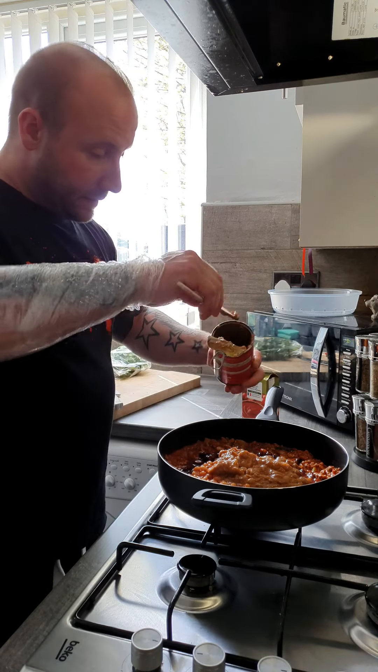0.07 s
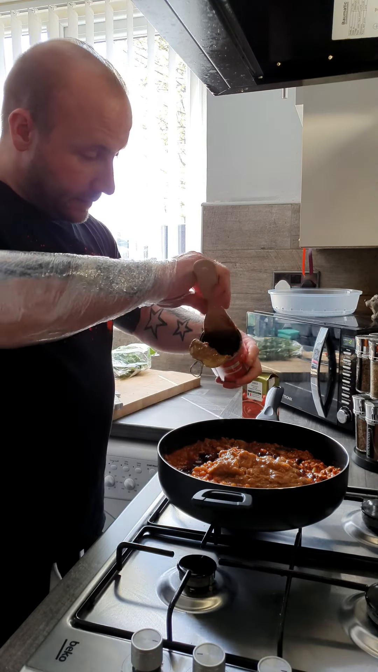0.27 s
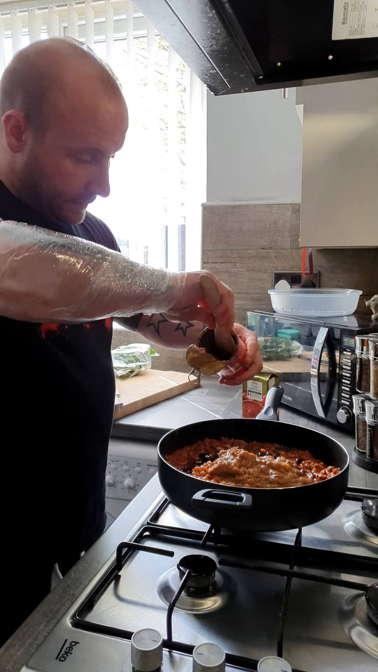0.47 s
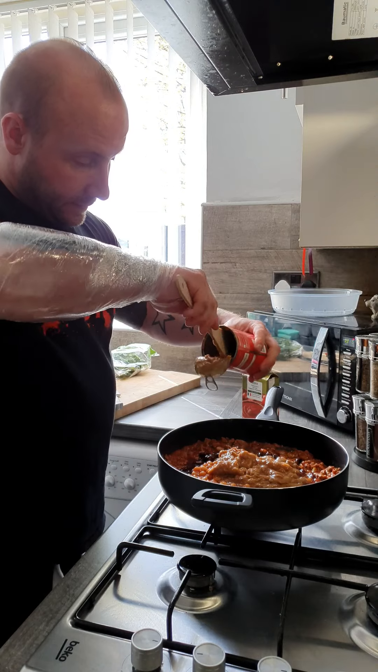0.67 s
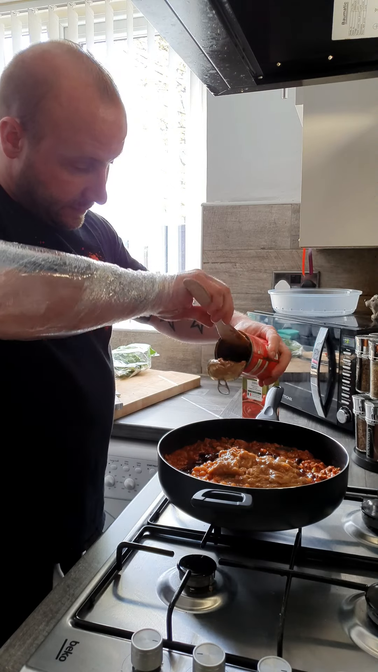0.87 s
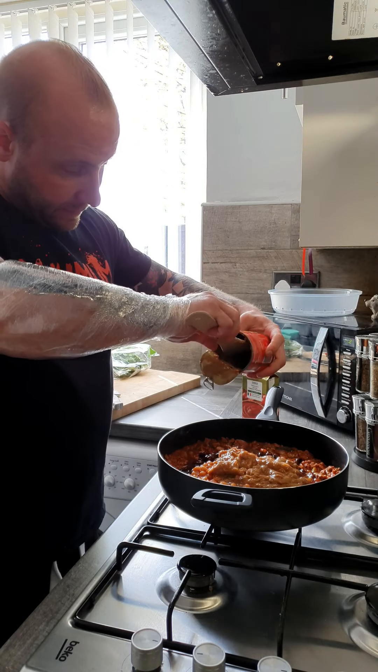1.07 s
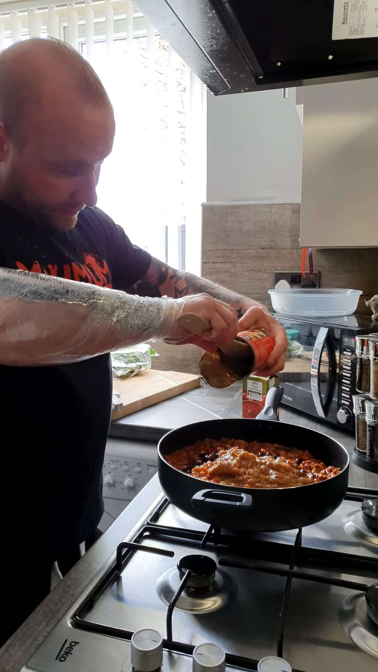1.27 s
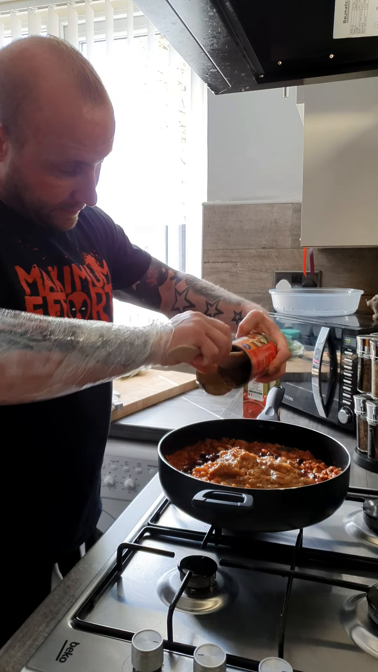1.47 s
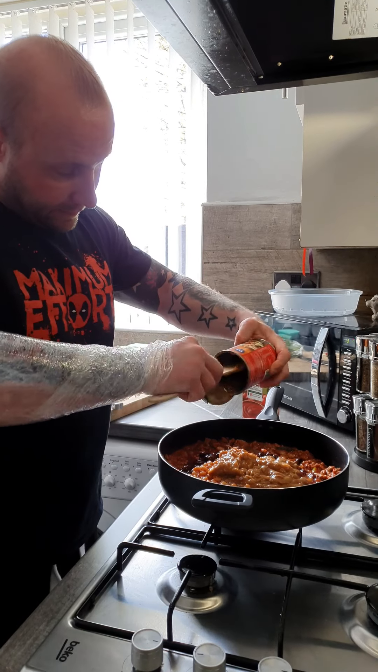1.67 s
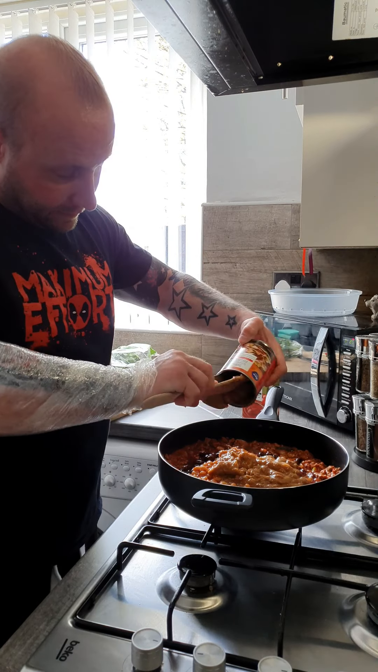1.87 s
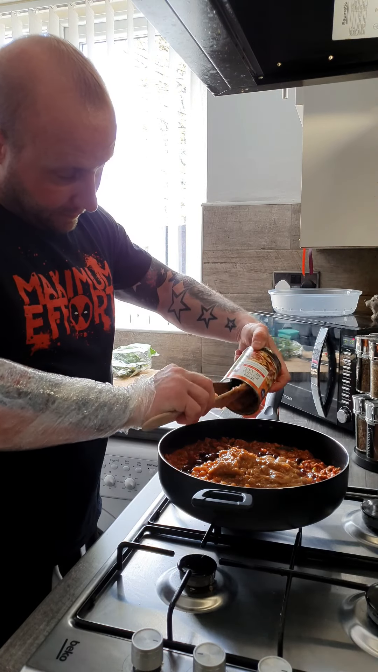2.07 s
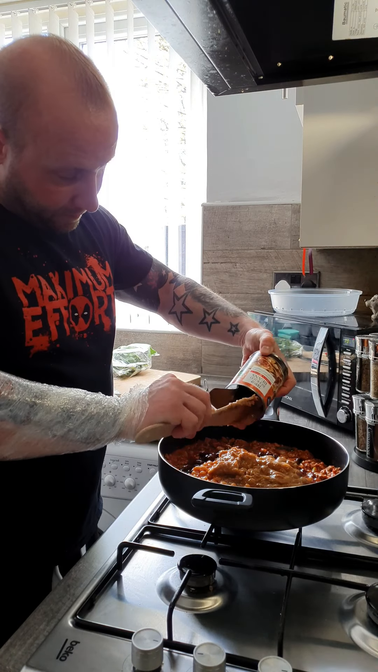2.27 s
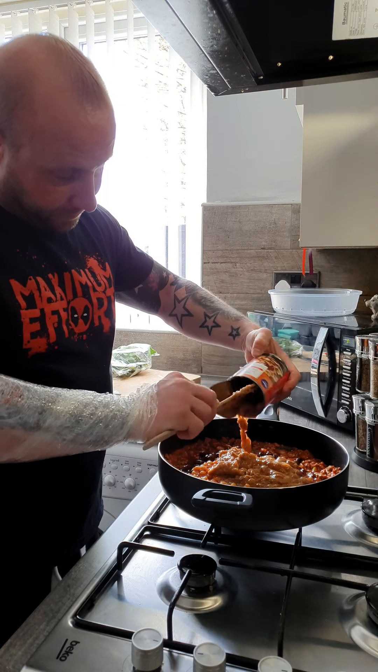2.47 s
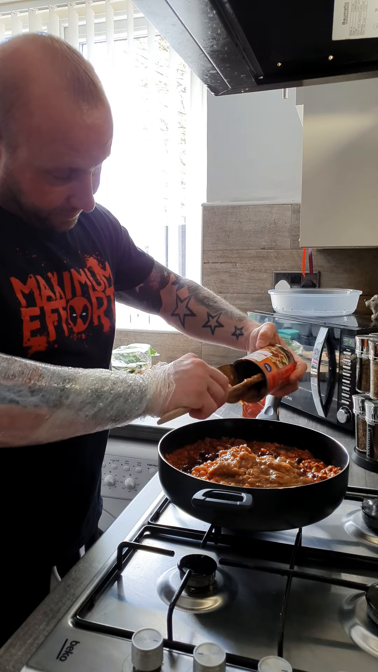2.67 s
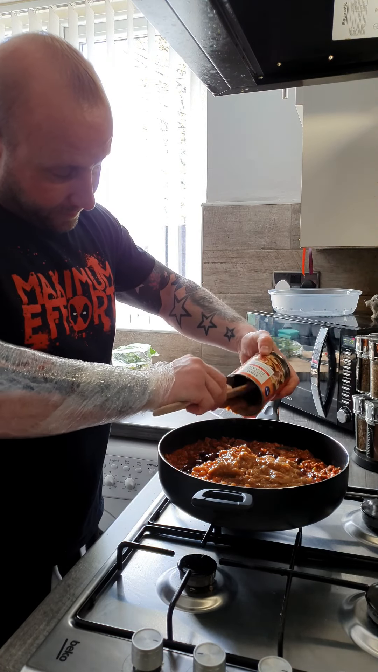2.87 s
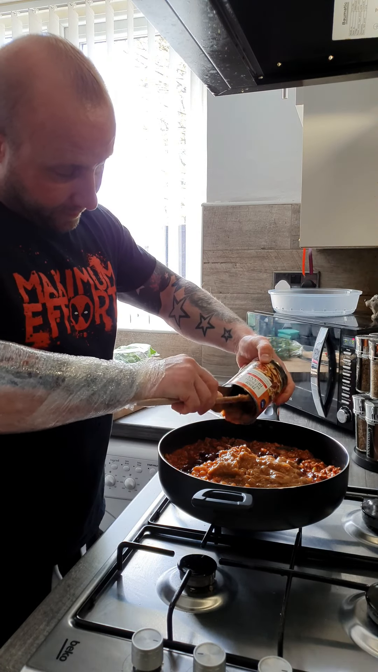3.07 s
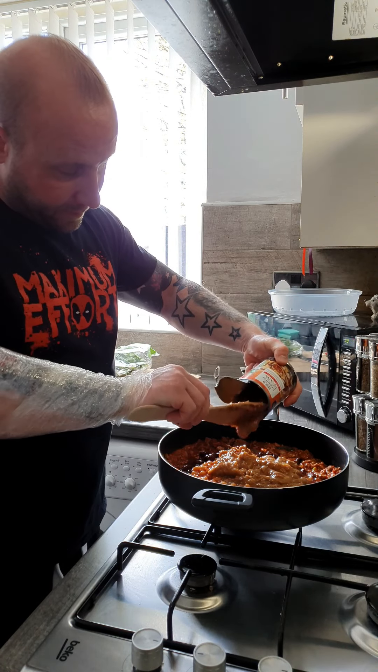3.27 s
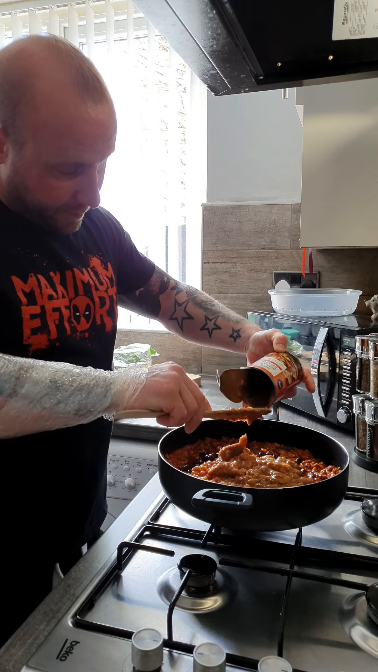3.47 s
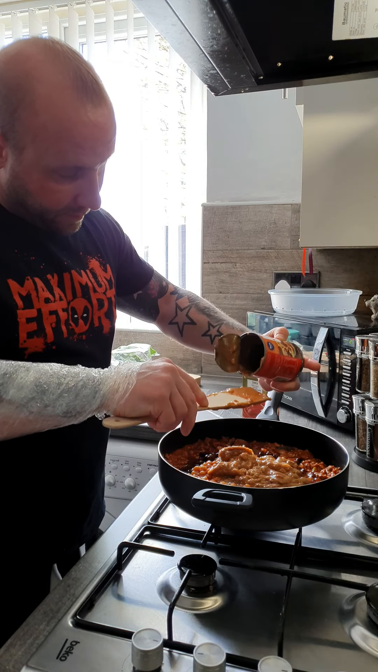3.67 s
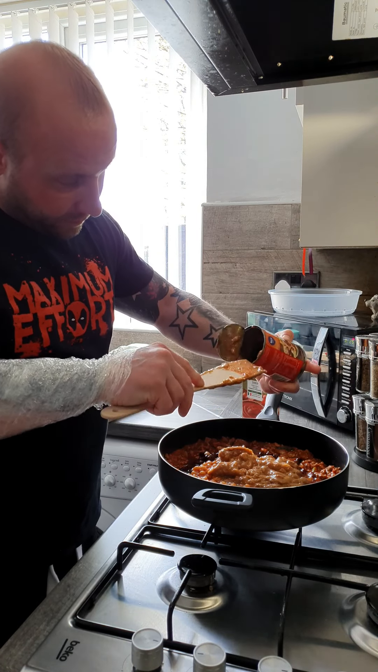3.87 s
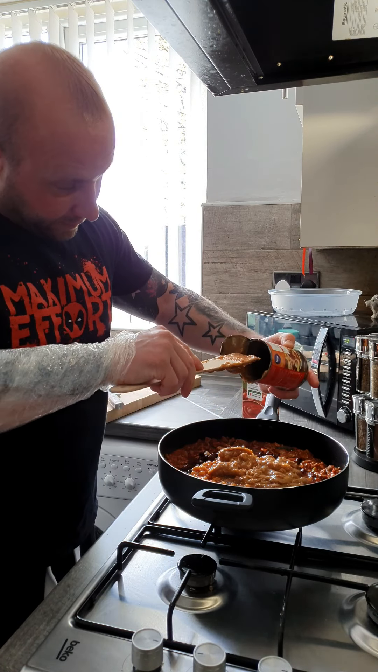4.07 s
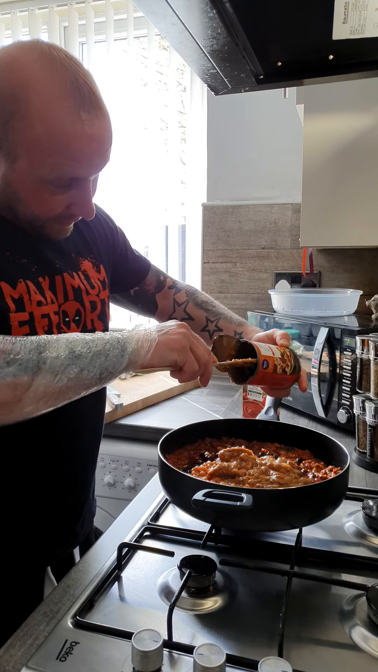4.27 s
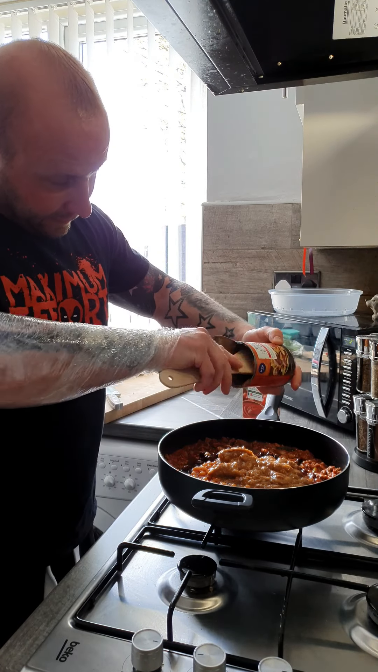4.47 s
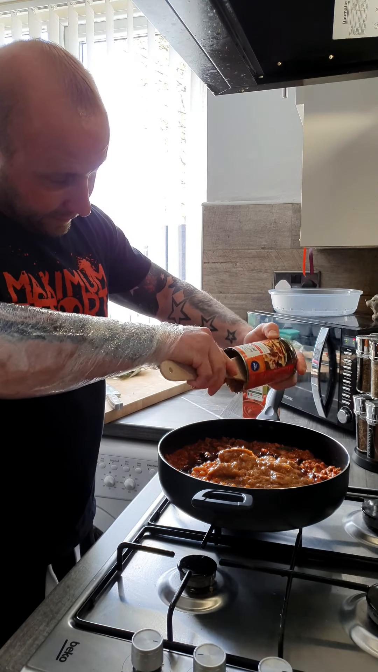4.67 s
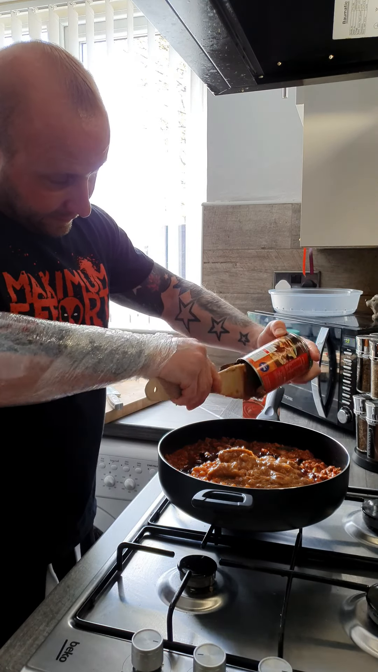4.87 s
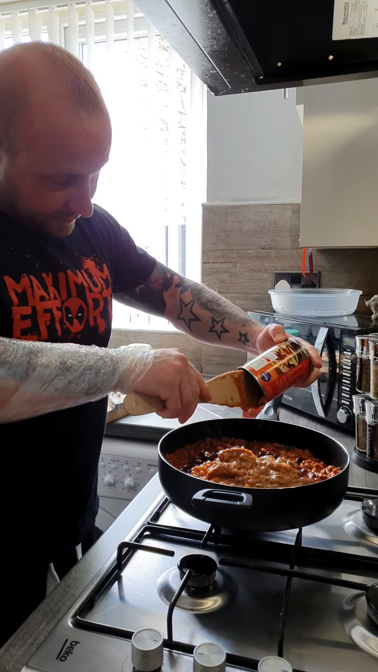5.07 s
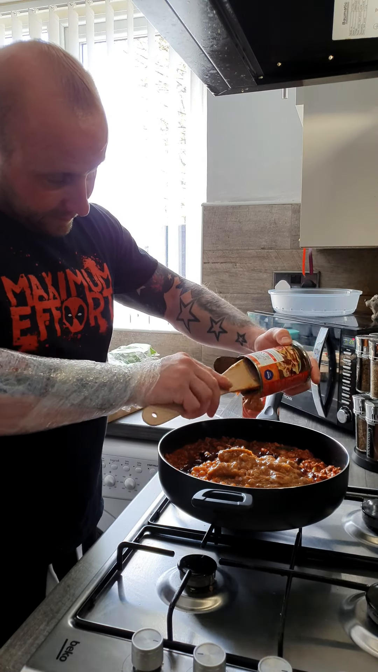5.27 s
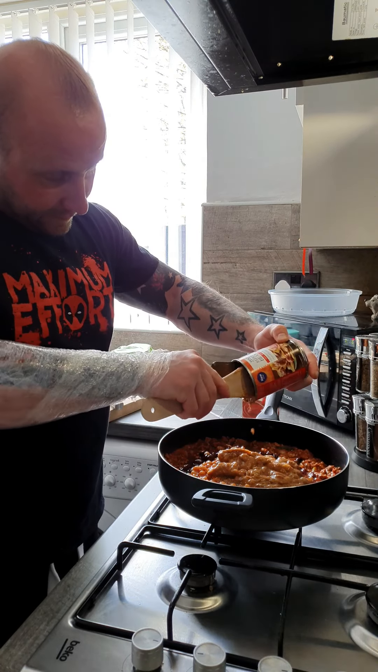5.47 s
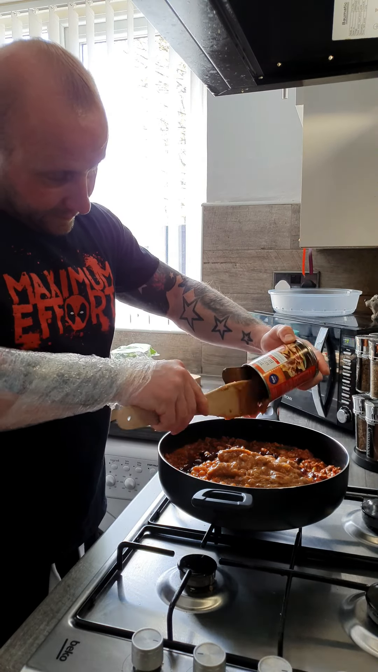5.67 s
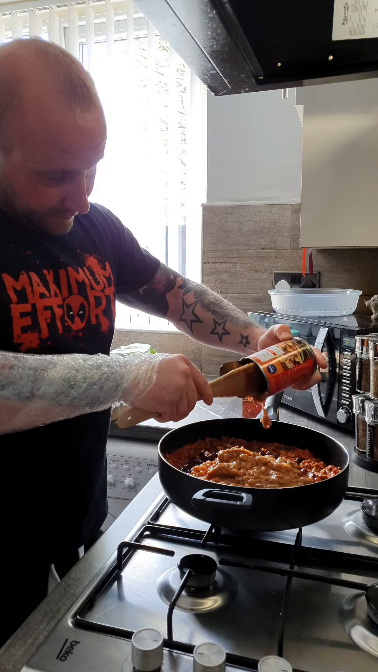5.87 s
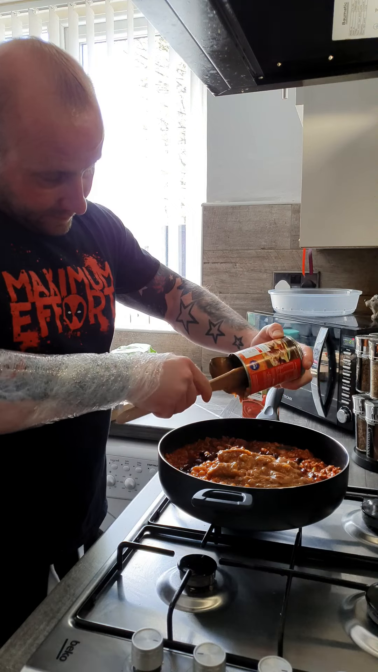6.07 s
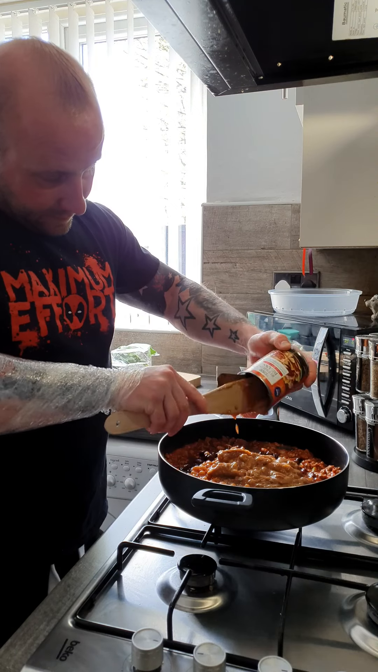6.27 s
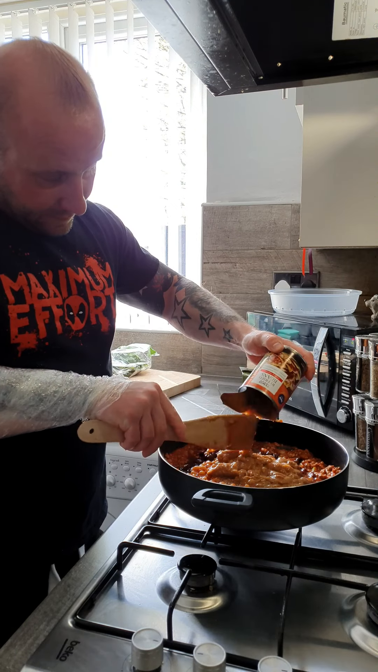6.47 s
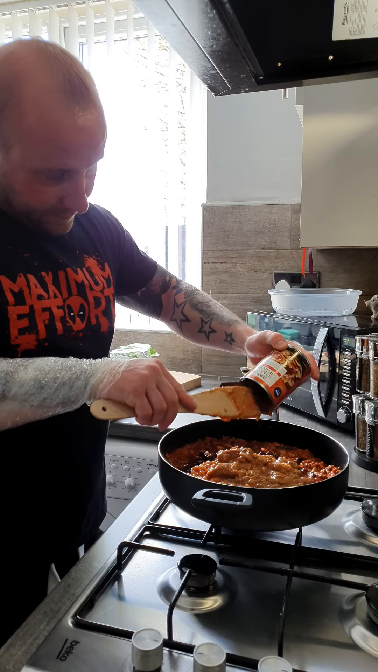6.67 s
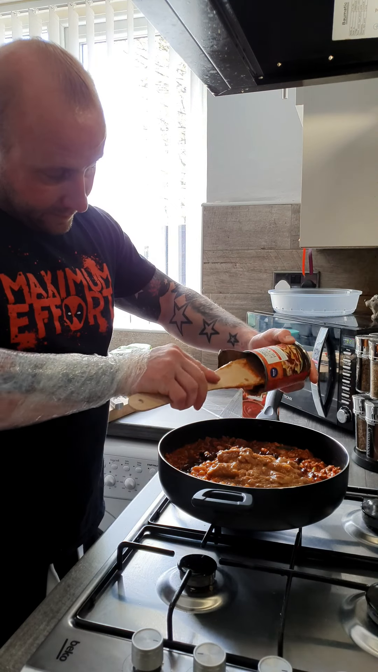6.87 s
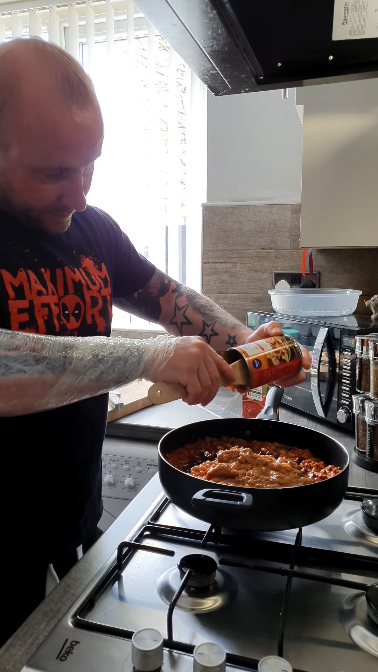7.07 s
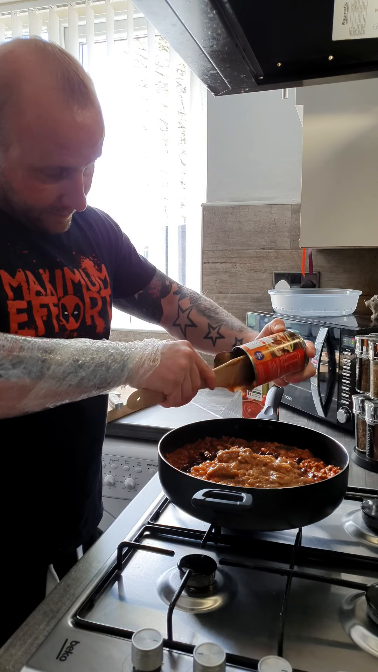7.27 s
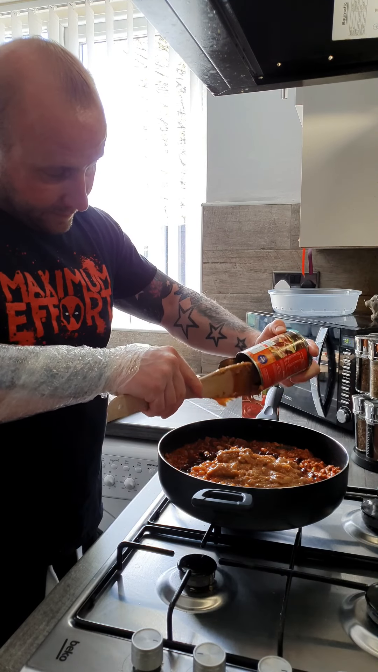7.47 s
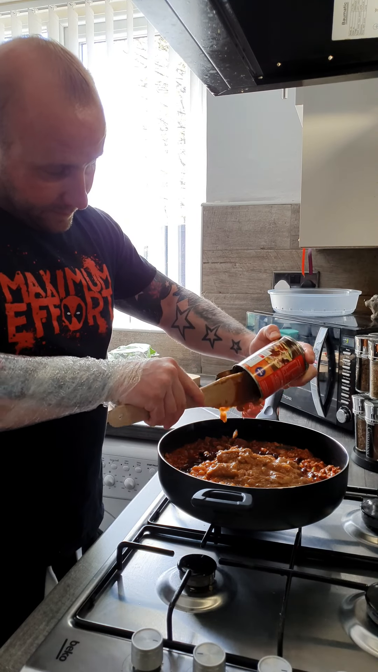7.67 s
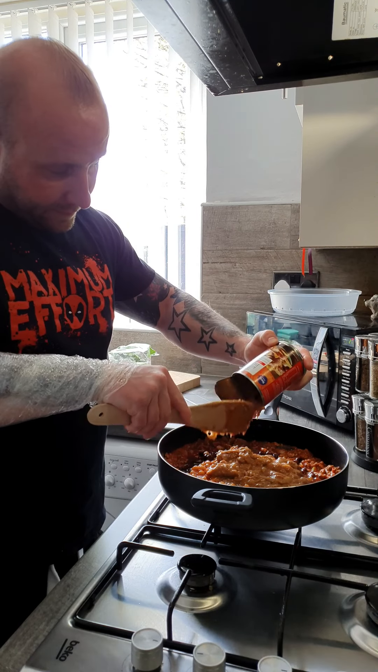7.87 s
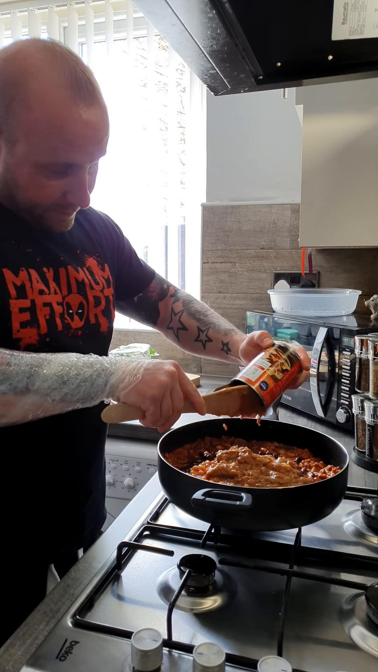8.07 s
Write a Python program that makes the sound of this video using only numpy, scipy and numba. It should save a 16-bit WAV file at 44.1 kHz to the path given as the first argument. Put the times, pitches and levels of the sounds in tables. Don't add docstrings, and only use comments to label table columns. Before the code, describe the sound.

A wooden spoon scrapes sauce from a hand-held tin about a metre from a phone in a small tiled kitchen. Short wet rasps alternate with crisp taps and dull knocks, each ringing the hollow can at a wavering mid-low pitch. A heavy low bump comes early, the loudest clatter just before five seconds, then sparser strokes over quiet room tone.

```python
import sys
import numpy as np
from scipy import signal
from scipy.fft import rfft, irfft, next_fast_len
from scipy.io import wavfile
from numba import njit

SR = 44100
rng = np.random.default_rng(int(sys.argv[2]) if len(sys.argv) > 2 else 0)


def log_audio(samples):
    frames = np.atleast_2d(samples).T
    limited = np.clip(frames, -1, 1)
    pcm = np.round(limited * 32767).astype(np.int16)
    wavfile.write(sys.argv[1], SR, pcm)


def volts_from_decibels(level):
    exponent = np.asarray(level, float) / 20
    return 10 ** exponent


N = 358076
TIME = np.arange(N) / SR

# frequency in Hz, level in dB per Hz.
ROOM_TONE = [(18, -31), (30, -1), (66, 2), (423, -22.5), (643, -19), (977, -26), (5230, -36), (5650, -27),
             (6440, -40), (15700, -39.5)]
# frequency in Hz, left minus right in dB.
LEFT_LEAD = [(150, 1), (380, 2), (700, 3.5), (1500, 5), (2400, 5.5), (4400, 13.5), (8000, 11.5), (12000, 4)]
# time in seconds, peak in dB, pitch in Hz, T60 in seconds.
BUMPS = [
    (1.414, -12, 59, 0.15),
    (3.817, -58, 117.7, 0.25),
    (4.133, -56.5, 74.2, 0.092),
    (7.018, -35, 78.6, 0.19),
    (7.454, -35, 87, 0.15),
    (7.509, -40, 109, 0.15),
]
# landing and lifting in seconds, pressure in dB,
# wet slide in dB above pressure, air in the tin in dB above pressure.
SCRAPES = [(0.0, 0.2, -61.5, -10.5, -10), (0.225, 0.45, -43.5, -8, -6.5), (0.81, 0.96, -43.5, -10.5, -6.5),
           (1.17, 1.27, -44, -17, -5.5), (1.48, 1.58, -51, -6.5, -10), (2.36, 2.52, -48.5, -8.5, 2),
           (2.87, 2.97, -47.5, -20.5, -5), (3.1, 3.22, -44, -8.5, 5.5), (4.2, 4.42, -46.5, -11, 4),
           (4.45, 4.57, -47, -7.5, 5.5), (4.725, 4.85, -37, -17.5, 4.5), (5.1, 5.26, -50, -10, 6),
           (5.48, 5.62, -57.5, -9, 3.5), (5.82, 5.95, -50, -8, -0.5), (6.03, 6.245, -65.5, -5, 5.5),
           (6.8, 7.03, -45, -10, 2.5), (7.2, 7.33, -70.5, -3, 10), (7.505, 7.63, -47.5, -15, 7),
           (7.962, 8.07, -46, -10, -0.5)]
# landing and lifting in seconds, pressure in dB,
# wet slide in dB above pressure, air in the tin in dB above pressure.
SKIDS = [(0.52, 0.63, -65.5, -13.5, -12.5), (6.745, 6.8, -72, -9, 22.5), (0.69, 0.74, -48, -21, -27),
         (1.0, 1.08, -56.5, -6, -8), (1.375, 1.42, -46, -12.5, 0.5), (1.63, 1.7, -64.5, -2, -11),
         (1.845, 1.88, -46.5, -14, 3), (1.96, 2.02, -62, -6, 2), (2.063, 2.13, -44, -13.5, 13.5),
         (2.17, 2.21, -53, -12, 5.5), (2.685, 2.71, -52.5, -13.5, -20), (2.772, 2.8, -42.5, -29, -13),
         (3.815, 3.89, -78.5, -28, -2), (4.1, 4.13, -81.5, 7, 5), (5.33, 5.39, -57, -6.5, -0.5),
         (5.757, 5.79, -41.5, -19.5, -4), (6.25, 6.29, -45.5, -8.5, -2), (6.35, 6.39, -50, -7, -1.5),
         (7.345, 7.38, -53.5, -15, -5.5), (7.42, 7.49, -70, -17.5, 7.5), (7.68, 7.76, -57.5, -10.5, 6)]
# start and end in seconds, first and last rate in Hz, level in dB.
RIBS = [
    (4.755, 4.85, 115, 180, -33.5),
    (4.85, 4.885, 200, 202, -36.5),
    (2.93, 2.98, 71, 100, -32.5),
    (5.5, 5.65, 140, 152, -49),
    (7.29, 7.37, 165, 190, -58.5),
]
# time in seconds, air peak in dB, wall and thud in dB above air.
TAPS = [(0.995, -28, -18, -2.5), (1.145, -31, -4, -11.5), (1.545, -35.5, -6.5, -35),
        (1.621, -35.5, -34, -15), (1.855, -20.5, -27, -18), (1.976, -34, -20, -29),
        (2.187, -17, -15.5, -37), (2.368, -27, -24, -45), (2.781, -24.5, -12, -8.5),
        (2.843, -29.5, -21, -23), (3.015, -31, -36, -26.5), (4.342, -30, -12.5, -32),
        (4.463, -17, -14.5, -11.5), (4.573, -17.5, -25, -36), (4.58, -16, -25.5, -19),
        (4.736, -32.5, -15, -23), (4.805, -9.5, -18, -28), (5.104, -36.5, -16, -12), (5.574, -28, -35, -22),
        (5.768, -20, -11, -20), (5.978, -21.5, -13.5, -15), (6.263, -24, -12, -20), (6.298, -26, -36, -19),
        (6.394, -36, -14, -30), (6.752, -33.5, -38, -22), (7.515, -32, -8, -4.5), (7.574, -29, -6.5, -9),
        (7.633, -19, -15, -12.5), (7.973, -33, -7.5, -14), (8.058, -18.5, -14.5, -15)]
# time in seconds, air peak in dB, wall and thud in dB above air.
KNOCKS = [(0.695, -42, -8, -6), (0.723, -27, -8, -7), (0.822, -32.5, -8, -8), (0.857, -32, -3.5, 0.5),
          (1.756, -45, -11, -11), (1.824, -36.5, -16.5, -15), (1.883, -26.5, -30.5, -4),
          (2.075, -19.5, -33.5, -25), (2.451, -41, -11.5, -25), (2.701, -34.5, -17.5, -11),
          (2.708, -33.5, -12.5, -9), (2.915, -20.5, -26, -23), (2.95, -14.5, -16, -13),
          (3.141, -23, -37, -20), (3.203, -30, -21, -25), (3.239, -25, -17, -20), (4.76, -17, -17.5, -17),
          (4.841, -12.5, -21, -16.5), (5.229, -30.5, -16.5, -10.5), (5.511, -32, -32, -26),
          (5.608, -28, -14, -13.5), (5.915, -27.5, -4, -28), (6.385, -42.5, -5.5, -19),
          (6.818, -30.5, -12.5, -14.5), (0.28, -37.5, -23, -25), (1.49, -36.5, -25, -25),
          (6.912, -33.5, -25, -34), (6.946, -28.5, -39, -32), (7.026, -28.5, -28, -4.5)]
# time in seconds, pitch in Hz.
MOUTH_PITCH = [(0.0, 588), (0.54, 697), (0.68, 587), (1.06, 699), (1.31, 616), (1.7, 682), (1.92, 562.4),
               (2.83, 618), (3.1, 563), (3.84, 645), (4.02, 560), (4.34, 635), (4.7, 601.2), (6.17, 640.6),
               (6.22, 600.6), (7.1, 640), (7.35, 597), (8.12, 623)]
# time in seconds, frequency in Hz.
RASP_PITCH = [(0.0, 1900), (0.42, 1520), (0.68, 1550), (0.95, 1930), (1.2, 1500), (1.6, 1760), (2.15, 1900),
              (2.5, 2300), (2.8, 2050), (2.97, 1480), (3.2, 2100), (4.45, 1440), (4.78, 1600), (4.86, 2300),
              (5.9, 2280), (6.8, 2250), (7.02, 1780), (7.36, 1330)]
# frequency in Hz, width in Hz, level in dB.
SPOON_MODES = [(211, 53, -7), (318, 54.7, 1.5), (374, 70, -1.5)]
# frequency in Hz, width in Hz, level in dB.
WALL_MODES = [(924.6, 210, 7), (1075.5, 32, -10.5), (1363, 74, 4.5), (1388, 130, -0.5), (1520, 48, -4),
              (1616, 62, -5.5), (1738, 99, -1), (1845, 43, -13.5), (1930, 87, -13.5), (2052, 34, -4),
              (2250, 61, -7), (2260, 15, -9.5), (2470, 34, -10.5), (2580, 72, -4), (3066, 136, 2),
              (3353, 27, -14), (3820, 63, -11), (3980, 57, -14.5)]
# frequency in Hz, level in dB per Hz.
FRICTION = [(470, -38), (800, -4.5), (1590, -4.5), (1870, -3), (2450, -3.5), (3480, 2), (4410, -9),
            (7820, -20), (11600, -21), (15700, -24.5)]

ROOM_DB, WHINE_HZ, WHINE_DB = -77.5, 5520, -90
KITCHEN_T60_S, KITCHEN_DB = 0.32, -8
RUMBLE_FLOOR_DB = -70.5
RUMBLE_DB, RUMBLE_SHARE, BUMP_RUMBLE_DB = -44, 0.48, -10.5
SCRAPE_BUILD_DB, SKID_BUILD_DB = 11, 6.5
LAND_S, LIFT_DB_PER_S = 0.018, 238
SWELL_S = 0.00348
TAP_SHUDDER_S, KNOCK_SHUDDER_S = 0.012, 0.023
DENT_SHARE, DENT_S = 0.12, 0.018
SPOON_DB = -5.5


def unit(x):
    return x / np.sqrt(np.mean(x ** 2))


def on_log(table, hz):
    f, v = np.transpose(table)
    return np.interp(np.log(hz + 1), np.log(f), v)


def colour(x, gain):
    size = next_fast_len(N)
    hz = np.arange(size // 2 + 1) * SR / size
    return irfft(rfft(x, size) * gain(hz), size)[..., :N]


@njit
def moving_band(x, hz, width):
    y, band, low = np.empty(len(x)), 0., 0.
    for i in range(len(x)):
        g, k = np.tan(np.pi * hz[i] / SR), width / hz[i]
        v = (band + g * (x[i] - low)) / (1 + g * (g + k))
        band, low, y[i] = 2 * v - band, low + 2 * g * v, k * v
    return y


def ring(x, hz, width):
    r, turn = np.exp(-np.pi * width / SR), 2 * np.pi * hz / SR
    return signal.lfilter([0, np.sin(turn)], [1, -2 * r * np.cos(turn), r * r], x + 1e-18)


def clicks(times, db):
    x = np.zeros(N)
    np.add.at(x, np.minimum((np.asarray(times) * SR).astype(int), N - 1), volts_from_decibels(db))
    return x


def fade(x, s):
    return signal.lfilter([1], [1, -np.exp(-1 / (s * SR))], x)


def sway(rate, db):
    knots = np.clip(rng.standard_normal(int(N / SR * 60)), -3, 1.3)
    return np.interp(TIME, np.arange(len(knots)) / rate, volts_from_decibels(db * knots))


def quiet():
    tone = colour(rng.standard_normal((2, N)), lambda f: volts_from_decibels(on_log(ROOM_TONE, f)) * (f > 120))
    whine = volts_from_decibels(WHINE_DB + 3.5) * sway(6, 1.5) * np.sin(2 * np.pi * WHINE_HZ * TIME)
    return volts_from_decibels(ROOM_DB + 3) * sway(7.9, 1.7) * unit(tone) + whine


def kitchen(x):
    t = np.arange(SR // 2) / SR
    tail = rng.standard_normal((2, len(t))) * volts_from_decibels(-60 * t / KITCHEN_T60_S) * (t > .008)
    tail /= np.sqrt(np.sum(tail ** 2, axis=1, keepdims=True))
    return volts_from_decibels(KITCHEN_DB) * signal.fftconvolve(x[None], tail, axes=1)[:, :N]


def ports(x):
    return colour(x, lambda f: volts_from_decibels(np.outer([.5, -.5], on_log(LEFT_LEAD, f))))


def bumps(pressure):
    thuds = sum(ring(clicks([s], db + 5.5), hz, 2.0 / t60) for s, db, hz, t60 in BUMPS)
    s, db = np.transpose(BUMPS)[:2]
    shake = fade(clicks(s, db + BUMP_RUMBLE_DB), 0.046) + volts_from_decibels(RUMBLE_FLOOR_DB)
    shake = shake + volts_from_decibels(RUMBLE_DB) * pressure ** RUMBLE_SHARE
    rumble = volts_from_decibels(-16) * shake * sway(16, 4.9) * ring(rng.standard_normal((2, N)), 73, 31)
    right = thuds + rumble[1]
    left = volts_from_decibels(-8.5) * rumble[0] - volts_from_decibels(-35.5) * right
    return colour(np.array([left, right]), lambda f: 1 / (1 + (38 / (f + 1)) ** 3) / (1 + (f / 150) ** 2))


def strokes():
    out = np.zeros((3, N))
    for rows, build_db in ((SCRAPES, SCRAPE_BUILD_DB), (SKIDS, SKID_BUILD_DB)):
        for t0, t1, db, slide_db, air_db in rows:
            i = slice(max(int(t0 * SR), 0), int((t1 + .5) * SR))
            t = TIME[i]
            build = -build_db * (t1 - t) / (t1 - t0)
            shape_db = np.minimum(build, -LIFT_DB_PER_S * (t - t1))
            level_db = db + np.array([[0], [slide_db], [air_db]])
            out[:, i] += volts_from_decibels(level_db + shape_db) * np.minimum((t - t0) / LAND_S, 1)
    return np.maximum(out, 1e-5)


def grains(rate, spread_db, alike):
    size = (rng.random(N) < rate / SR) * volts_from_decibels(spread_db * np.minimum(rng.exponential(size=N), 3.5))
    common, own = rng.standard_normal(N), rng.standard_normal((2, N))
    return unit(size * (np.sqrt(alike) * common + np.sqrt(1 - alike) * own))


def ribs():
    drive, uneven = np.zeros(N), volts_from_decibels(2.5 * rng.standard_normal(N))
    for t0, t1, hz0, hz1, db in RIBS:
        rate = np.interp(TIME, [t0, t1], [hz0, hz1]) * (TIME > t0) * (TIME < t1)
        drive += volts_from_decibels(db) * np.diff(np.floor(np.cumsum(rate / SR)), prepend=0)
    return drive * uneven


def shudder(at, db, length, hz):
    x, chance = np.zeros(N), rng.random((len(at), 2))
    for t0, level, s, (turn, off) in zip(at, volts_from_decibels(db), length, chance):
        i = np.arange(int(t0 * SR), min(int((t0 + s) * SR), N))
        t = TIME[i] - t0
        swell = np.abs(np.sin(np.pi * t / s))
        x[i] += level * swell * np.sin(2 * np.pi * (turn + hz[i[0]] * (1.1 + 0.023 * off) * t))
    return x


def crack(x, s):
    return rng.standard_normal((2, N)) * fade(x, s) / np.sqrt(s * SR / 2)


def body(modes, drive, patchy_db, spread):
    angle = np.pi / 4 + spread * rng.uniform(-0.97, 1, len(modes))
    aim = np.sqrt(2) * np.array([np.cos(angle), np.sin(angle)]).T[:, :, None]
    return sum(a * ring(volts_from_decibels(db) * sway(7, patchy_db) * drive, hz, w) for a, (hz, w, db) in zip(aim, modes))


def spoon(jolts, pressure, slips, rib):
    drive = volts_from_decibels(SPOON_DB - 26.5) * pressure * slips + jolts + volts_from_decibels(2.0) * rib
    bending = body(SPOON_MODES, drive, 3.6, 0.95)
    return colour(bending, lambda f: 1 / (1 + (130 / (f + 1)) ** 3) / (1 + (f / 520) ** 3))


def friction(pressure, slide, fine, clank, rasp_hz):
    rasp = volts_from_decibels(1.0) * pressure * fine + volts_from_decibels(19) * clank
    hiss = volts_from_decibels(21.5) * slide * sway(16, 1.8) * fine + volts_from_decibels(17) * clank
    rasp += volts_from_decibels(18) * np.array([moving_band(c + 1e-18, rasp_hz, 130.0) for c in rasp])
    patch_hz = np.clip(9800 * sway(9, 2.4), 5000, 15000)
    hiss += np.array([moving_band(c + 1e-18, patch_hz, 1500.0) for c in hiss])

    def shape(f):
        return volts_from_decibels(on_log(FRICTION, f))

    def edge(f):
        return 1 / (1 + (f / 4600) ** 8)

    return colour(rasp, lambda f: shape(f) * edge(f)) + colour(hiss, lambda f: shape(f) * (1 - edge(f)))


def air(x, hz):
    fed = moving_band(moving_band(x + 1e-18, hz, 190.0), 1.037 * hz, 160.0)
    modes = moving_band(fed, hz, 42.)
    modes += volts_from_decibels(-6.5) * moving_band(fed, 1.1 * hz, 28.0)
    modes += volts_from_decibels(-2.0) * moving_band(fed, 0.914 * hz, 38.0)
    return modes * SR / 120


def tin(pressure, slide, boom):
    at, db, clank_db, thud_db = np.transpose(TAPS + KNOCKS)
    at = at - SWELL_S
    length = np.repeat([TAP_SHUDDER_S, KNOCK_SHUDDER_S], [len(TAPS), len(KNOCKS)])
    air_hz = np.interp(TIME, *np.transpose(MOUTH_PITCH))
    rasp_hz = np.interp(TIME, *np.transpose(RASP_PITCH))
    dent = np.minimum(fade(clicks(at, 0), DENT_S), 1)
    air_hz = air_hz * (1 + DENT_SHARE / 4 - DENT_SHARE * dent)

    slips = grains(900, 2.2, 0.92)[0] * sway(45, 5.98)
    fine = grains(12000, 1.8, 0.095) * sway(30, 5.25)
    rib = ribs()
    blows = clicks(at, db - 11) + shudder(at, db - 46.5, length, air_hz)
    bump_s, bump_db = np.transpose(BUMPS)[:2]
    jolts = clicks(at, db + thud_db - 0.5) + clicks(bump_s, 0.62 * bump_db - 17.5)
    tick = clicks(at, db + clank_db - 6)
    clank = crack(tick, 0.015) + volts_from_decibels(-3.5) * crack(tick, 0.0025) + volts_from_decibels(-13.0) * crack(rib, 0.003)

    note = air(volts_from_decibels(-24.5) * boom * slips + blows + volts_from_decibels(4.5) * rib, air_hz)
    wall = body(WALL_MODES, volts_from_decibels(-36) * pressure * (slips + fine[0]) + clank[0], 4.0, 1.73)
    scrape = friction(pressure, slide, fine, clank, rasp_hz)
    return note + spoon(jolts, pressure, slips, rib) + wall + scrape


def scene():
    contact = strokes()
    can = tin(*contact)
    return ports(can + kitchen(can[0])) + bumps(contact[0]) + quiet()


def top_cut(x):
    return signal.sosfilt(signal.butter(12, 15870, fs=SR, output="sos"), x)


def record(dry):
    return top_cut(dry)


dry = scene()
out = record(dry)
log_audio(out)
```